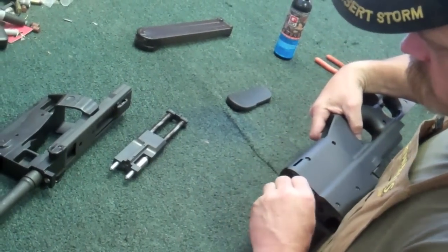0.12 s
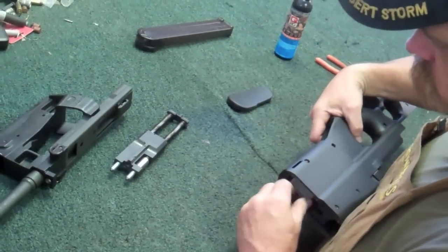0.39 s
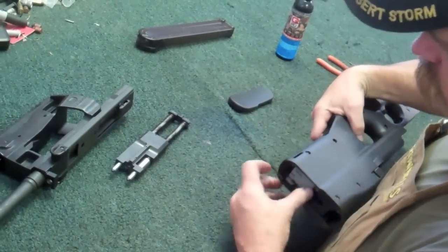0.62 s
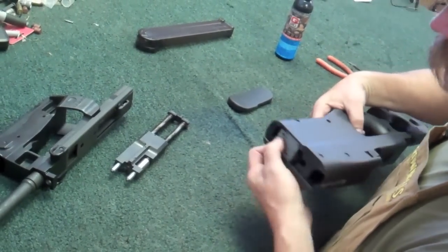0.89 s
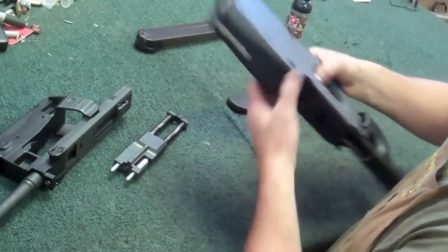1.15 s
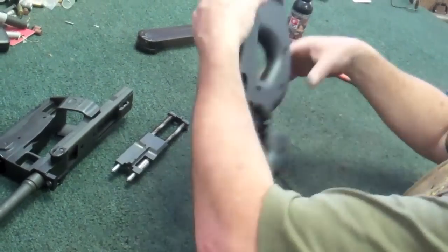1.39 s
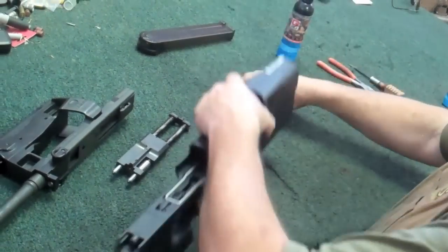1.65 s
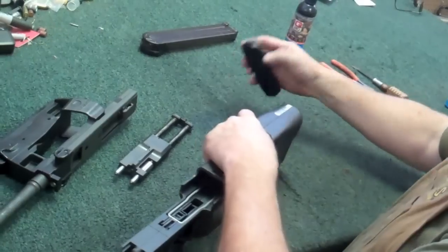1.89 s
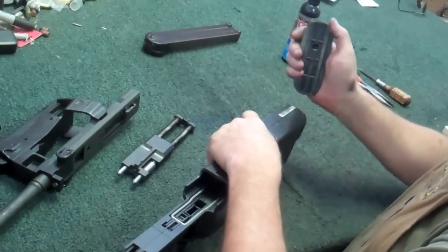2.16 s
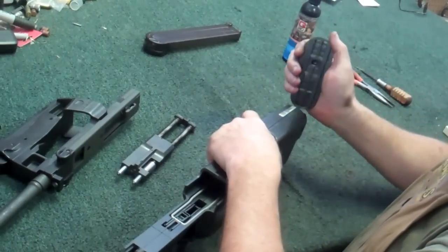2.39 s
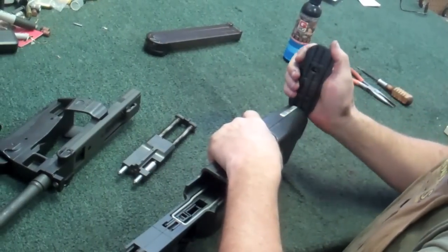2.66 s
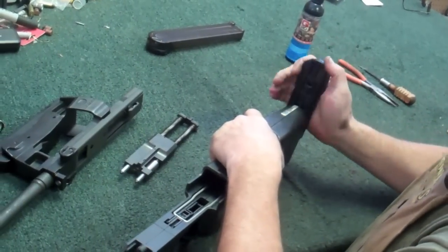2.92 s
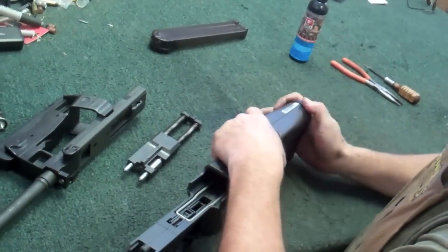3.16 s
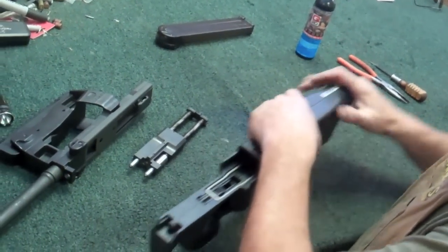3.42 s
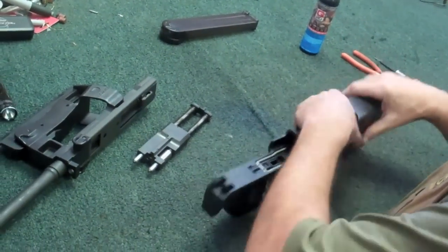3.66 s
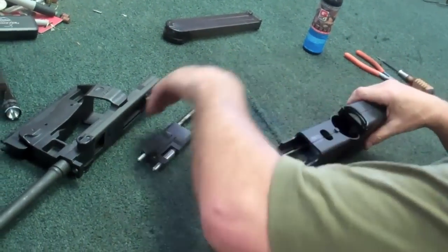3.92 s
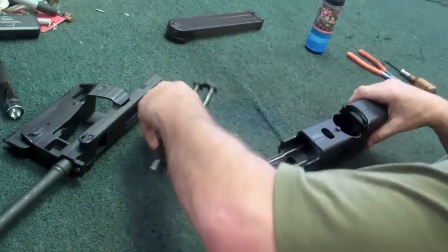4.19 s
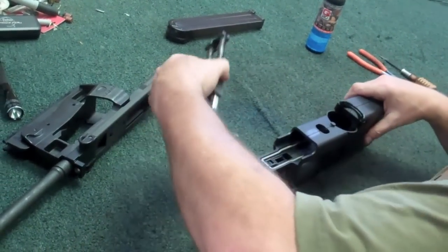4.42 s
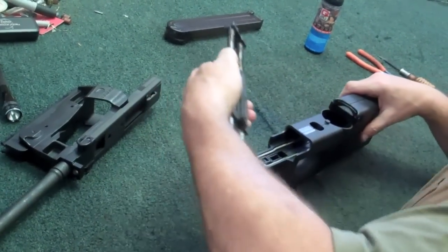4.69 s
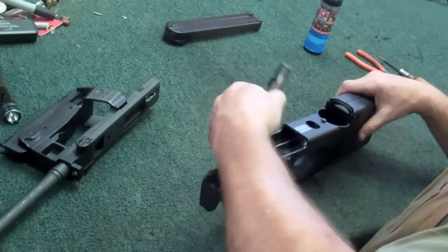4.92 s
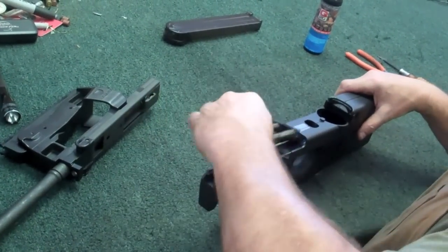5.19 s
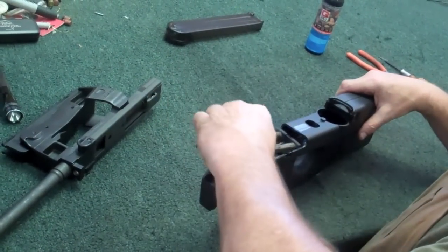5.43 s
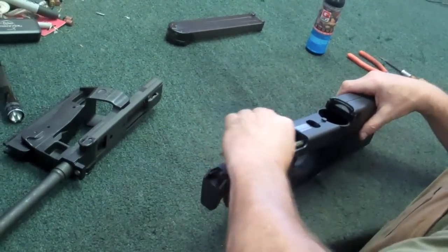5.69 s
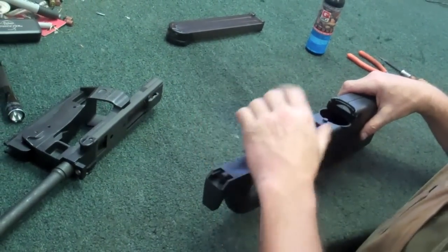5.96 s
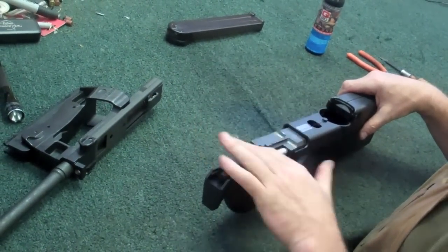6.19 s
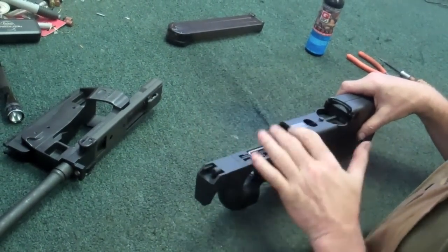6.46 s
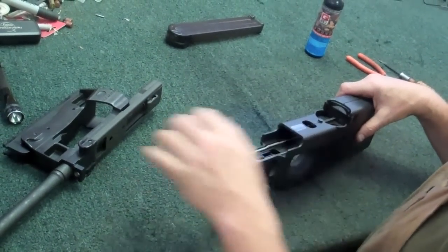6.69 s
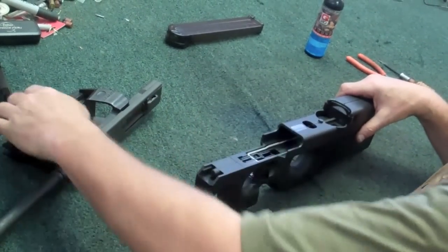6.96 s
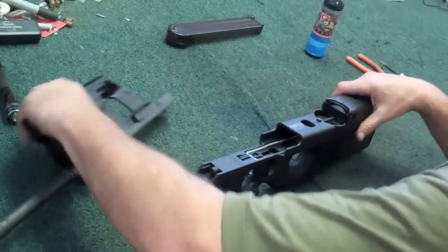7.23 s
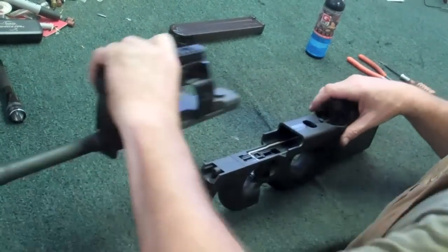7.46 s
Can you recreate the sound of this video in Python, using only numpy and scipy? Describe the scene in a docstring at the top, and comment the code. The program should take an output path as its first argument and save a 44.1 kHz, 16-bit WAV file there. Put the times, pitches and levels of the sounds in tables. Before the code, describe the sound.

In a small room, hollow polymer and steel firearm parts are handled close to a stereo microphone, louder on the left. Under everything lie steady hiss and a faint low lamp hum; a soft low rush swells briefly at 0.1 s. A rattling clack comes at 0.14 s, a loud hard snap at 0.43, then small bright ticks at 0.85, 1.15 and 1.58 with faint rubbing. Quiet knocks around 1.8 and 2.4-2.8 lead to a short rasp and the strongest, driest crack at 3.07. At 3.7 a scrape and dull bench thuds land with a small click. A lull follows, with another low rush around 4.3 and only faint clicks until 5.7. Sharp clacks burst at 5.8, then short slides catch in snaps at 6.25, 6.3 and 6.43. A bright tick at 7.23 and light rubbing finish by 7.6. Background noise dips after loud snaps, then creeps back.

```python
"""In a small room, over a felt-topped bench, two hands make steel and polymer firearm parts click and slide.
Contacts are rattling cracks that excite the modes of the hollow shell; rubbing is patchy noise, bright
by itself and dull through the shell. The stock, set down, thuds by ringing the low modes of the bench top.
The room answers with a decaying noise tail. Lamps hum in harmonics, microphones hiss, and a low rush
swells and fades twice. Gain control ducks the whole after the loud snaps."""
import sys
import numpy as np
from scipy import signal
from scipy.fft import rfft, irfft, next_fast_len
from scipy.io import wavfile
from scipy.ndimage import uniform_filter1d, map_coordinates

SR = 44100
rng = np.random.default_rng(int(sys.argv[2]) if len(sys.argv) > 2 else 0)


def to_wav(sig):
    """Store sig (one row per channel, or 1-D mono) as 16-bit WAV at the path in sys.argv[1].

    Samples outside -1..1 are clipped; the rate is SR.
    """
    pcm = np.clip(np.atleast_2d(sig), -1, 1) * 32767
    pcm = np.round(pcm).astype(np.int16)
    wavfile.write(sys.argv[1], SR, pcm.T)  # frames by channels


def linear_from_db(decibels):
    """Turn decibels (scalar or array-like) into linear amplitude factors; 0 gives 1."""
    return 10 ** (np.asarray(decibels, float) / 20)


N = 334719

# impacts of part on part: (time [s], relative crack level [dB], pitch the blow favours [Hz],
# hardness [0 polymer knock .. 1 steel tick], rattle decay t60 [s])
IMPACTS = [(0.0883, -32.5, 1150, .2, 0.064), (0.0964, -35.5, 770, 0.043, 0.049),
           (0.1326, -29.5, 770, 0.083, 0.017), (0.138, -13, 950, 0.33, 0.059),
           (0.143, -9.5, 1300, 0.15, 0.021), (0.421, -14.5, 934, 0.36, 0.054),
           (0.429, 1, 1496, 0.47, 0.031), (0.4329, -3.5, 1763, 0.41, 0.027),
           (0.589, -38, 2600, 0.37, 0.022), (0.7854, -41, 1420, 0.65, .02),
           (0.8418, -28, 1670, 0.87, 0.022), (0.8518, -19.5, 1690, 0.82, 0.027),
           (1.145, -19.5, 894, 1, 0.021), (1.1952, -48, 870, .16, 0.013), (1.2441, -33.5, 813, 0.86, 0.024),
           (1.3428, -49, 1700, 0.2, 0.022), (1.3634, -42.5, 1690, 0.26, .022),
           (1.435, -33.5, 1710, 0.63, 0.043), (1.467, -40, 1690, .48, .025),
           (1.4898, -39, 1700, 0.74, .015), (1.5801, -19, 1780, 0.54, 0.025),
           (1.5844, -19.5, 1680, 0.38, 0.028), (1.8076, -40.5, 1160, 0.57, 0.034),
           (1.8654, -43, 840, 0.36, 0.033), (2.4051, -27.5, 700, 0.2, 0.084),
           (2.554, -53.5, 790, 0.19, 0.023), (2.625, -45, 1025, 0.17, 0.015),
           (2.6678, -32, 770, 0.041, 0.038), (2.6764, -35.5, 840, .06, 0.067),
           (2.7229, -34.5, 970, 0.095, 0.022), (2.8279, -37, 1110, 0.24, 0.067),
           (3.07, 2, 2170, 0.42, .014), (3.0759, -12, 1120, 0.27, 0.013), (3.089, -27.5, 1125, 0.19, 0.033),
           (3.3276, -41.5, 890, 0.38, 0.034), (3.4191, -44, 890, 0.34, 0.023), (3.691, -33, 890, 0.29, .03),
           (3.713, -22, 896, 0.51, 0.026), (3.763, -48, 900, 0.59, .02), (4.056, -40.5, 884, 0.53, 0.091),
           (4.1754, -39.5, 2090, 0.45, 0.035), (5.2795, -43, 880, 0.083, 0.063),
           (5.4647, -33, 870, 0.28, 0.044), (5.4897, -38.5, 876, 0.19, .025),
           (5.5484, -47, 1260, 0.26, .022), (5.6717, -43, 880, 0.11, .015), (5.6996, -32.5, 940, 0.92, .01),
           (5.7836, -11.5, 1790, 0.56, 0.048), (5.787, -6.5, 804, 0.35, 0.01),
           (5.8084, -2, 700, 0.39, 0.022), (6.2478, -9.5, 1300, .5, 0.04), (6.3046, -2.5, 960, 0.45, 0.022),
           (6.3178, -13.5, 906, 0.42, .033), (6.3467, -26, 890, 0.19, 0.019),
           (6.4209, -14.5, 920, 0.42, .02), (6.429, -4, 1547, 0.45, 0.058),
           (6.437, -4.5, 1227, 0.51, 0.033), (7.2266, -17.5, 1780, 0.84, 0.026)]
# modes of the polymer shell and its steel inserts: (frequency [Hz], base level [dB], undamped-by-hand t60 [s])
SHELL_MODES = [(486, 1.5, 0.012), (616, 1, 0.01), (770, 2, 0.029), (930, 3, 0.027), (1049, 4, 0.077),
               (1125, -3, 0.27), (1160, -6, 0.019), (1282, -4.5, 0.073), (1442.6, -3, 0.046),
               (1690, 0, 0.05), (1833, -3.5, 0.044), (2180, -6, 0.017), (2456, 0, 0.034),
               (2980, -8.5, 0.0044), (4110, -4, 0.012), (4967, -16, 0.0026)]
# crack spectrum before its tilt with hardness: (frequency [Hz], relative density [dB])
CRACK_SPECTRUM = [(180, -33), (300, -24.5), (1010, -0.5), (2270, -0.5), (4300, -4), (6180, -2.5),
                  (7160, -6), (13600, -8.5), (15300, -35.5)]


def contacts(room_db=-13):
    """Impact excitation: a rattling crack sets the shell modes near its favoured pitch ringing."""
    out = np.zeros((2, N + SR))
    t = np.arange(SR // 5) / SR
    for start_s, level_db, favoured_hz, hardness, t60 in IMPACTS:
        # from softest to hardest: ring level over the crack [dB], brightness [dB per octave]
        ring_db = 11 + hardness * (-31.5 - 11)
        bright_db = -7 + hardness * (10 - -7)
        colour = lambda f: linear_from_db(along(CRACK_SPECTRUM, f) + bright_db * np.log2(f / 5000 + 0.06))

        swell = linear_from_db(-60 * t / max(t60, .004)) * (1 - np.exp(-t / 0.001))
        burst = rng.standard_normal((2, len(t))) * swell
        # the finest rattle differs from port to port
        fine_rattle = burst[1] - uniform_filter1d(burst[1], size=7)
        burst[1] = 0.64 * burst[0] + 0.42 * fine_rattle
        crack = filtered(burst, colour)
        crack_gain = linear_from_db(level_db + 1.5) / abs(crack[0]).max()

        blow = np.linalg.norm(swell) * (t == t[30])  # the single impact inside the rattle
        blow_click = crack_gain * filtered(blow, colour)
        ring = filtered(blow + burst[0], favouring(SHELL_MODES, favoured_hz, fall_db=12.5, focus_db=5.5))
        ring = linear_from_db(level_db + ring_db) * ring / abs(ring).max()

        sound = linear_from_db(room_db) * echo(ring + blow_click)
        sound[:, :len(t)] += ring + crack_gain * crack + 0.13 * blow_click
        start = round(start_s * SR)
        out[:, start:][:, :sound.shape[1]] += sound[:, :N + SR - start]
    return out[:, :N]


def favouring(modes, hz, fall_db, focus_db):
    """Selective modal excitation: strongest at the favoured pitch, with new random strengths each time."""
    excited = []
    for f, level, t60 in modes:
        octaves = abs(np.log2(f / hz))
        focus = focus_db * np.exp(-(octaves / 0.087) ** 2)
        excited.append((f, level - fall_db * octaves + focus + rng.normal(0, 1), t60))
    return ringing(excited)


def ringing(modes, damping=1):
    """Modal superposition: the causal response of damped resonators, which extra damping widens."""
    def response(f):
        total = 0
        for k, (centre, db, t60) in enumerate(modes):
            width = damping * np.log(1000) / (np.pi * t60)  # bandwidth [Hz]
            resonance = 1j * f * width / (centre * centre - f * f + 1j * f * width)
            total = total + (-1) ** k * linear_from_db(db) * resonance
        return total
    return response


# spectrum of bare rubbing: (frequency [Hz], relative density [dB])
SCRAPE_SPECTRUM = [(880, -29), (1500, -10.5), (2270, -2.5), (2480, -7), (4860, -5.5), (13100, -4.5),
                   (14600, -0.5), (15000, -45)]


def slides(room_db=-8):
    """Friction noise: uneven grit radiates brightly by itself and dully through the damped shell."""
    scrape_gain, shell_gain = strokes(rub_curves())
    scrape = unit(filtered(grit(patchy_db=2.5), lambda f: linear_from_db(along(SCRAPE_SPECTRUM, f))))
    shell = unit(filtered(grit(patchy_db=5.0), ringing(SHELL_MODES, damping=3.3)))
    direct = scrape_gain * scrape + shell_gain * shell
    return direct + linear_from_db(room_db) * echo(direct)[:, :N]


# parts sliding home, ever louder until they catch:
# (start [s], catch [s], relative scrape level at the catch [dB], shell level over scrape [dB])
SLIDES_HOME = [(0.402, 0.421, -43, 4.5), (3.009, 3.064, -26, -7.5), (3.599, 3.684, -44, -14.5),
               (5.755, 5.777, -28.5, -10), (5.798, 5.805, -32, 4), (6.217, 6.243, -40, -8),
               (6.262, 6.297, -23.5, -7), (6.327, 6.414, -29.5, -5.5), (7.061, 7.219, -54, -3)]
# fingers and parts rubbing:
# (start [s], strongest [s], end [s], relative scrape level at the strongest [dB], shell level over scrape [dB])
RUBBINGS = [(0, -0.001, 0.12, -56, 2.5), (0.295, 0.347, 0.49, -52, -3.5), (0.507, 0.541, 0.67, -53.5, 2.5),
            (.74, 0.795, 0.86, -50.5, -10.5), (0.944, .974, 1.08, -50, -8), (1.2, 1.222, 1.34, -48, -5.5),
            (1.276, 1.36, 1.44, -49, -21), (1.429, 1.458, 1.49, -47, -16), (1.652, 1.71, 1.95, -57, -1),
            (2.632, 2.68, 2.77, -59, 10), (2.847, 2.876, 2.98, -51, -2.5), (3.422, 3.478, 3.99, -52.5, -9),
            (3.682, 3.716, 3.772, -36, 0.5), (5.463, 5.48, 5.52, -52.5, 7), (7.318, 7.425, 7.6, -48.5, -21)]


def rub_curves():
    """Amplitude envelopes (time [s], scrape [dB], shell [dB]): a run-in only rises, a rub swells and fades."""
    rise_db, fade_in_db, fade_out_db = 14, 6.5, 16
    point = lambda s, db, shell_db: (s, db, db + shell_db)
    curves = []
    for start, catch, db, shell_db in SLIDES_HOME:
        curves.append([point(start, db - rise_db, shell_db), point(catch, db, shell_db)])
    for start, strongest, end, db, shell_db in RUBBINGS:
        curves.append([point(start, db - fade_in_db, shell_db), point(strongest, db, shell_db),
                       point(end, db - fade_out_db, shell_db)])
    return curves


def grit(patchy_db):
    """Stochastic friction: noise in short patches of random strength over time and pitch."""
    z = signal.stft(rng.standard_normal(N), nperseg=128)[2]
    field = uniform_filter1d(rng.standard_normal(z.shape), size=7, axis=0)
    field = uniform_filter1d(field, size=5, axis=1)
    noise = signal.istft(z * linear_from_db(patchy_db * unit(field)), nperseg=128)[1][:N]
    return noise * linear_from_db(1.2 * wobble(90))


def strokes(curves):
    """Amplitude modulation: a gain for each dB column of several short curves, silent between them."""
    t, total = np.arange(N) / SR, 0
    for rows in curves:
        s, *levels = np.transpose(rows)
        edge = np.clip(np.minimum((t - s[0]) / .003, (s[-1] - t) / .009) + 1, 0, 1)
        total = total + edge * linear_from_db(np.array([np.interp(t, s, db) for db in levels]))
    return total


# the stock meets the bench: (time [s], relative level [dB], pitch the push favours [Hz])
STOCK_LANDINGS = [(1.661, -44, 210), (1.803, -39.5, 70.0), (2.843, -46.5, 120.4), (3.063, -23, 401.5),
                  (3.127, -31.5, 163), (3.68, -19, 82), (3.701, -22.5, 234), (3.715, -25.5, 216),
                  (3.735, -26.5, 114.4), (3.769, -42, 148), (4.048, -50, 206.7), (5.463, -41.5, 225),
                  (5.8, -38, 76.4), (6.239, -40, 206.4), (6.337, -34.5, 299), (6.436, -30.5, 283),
                  (7.23, -46, 234)]
# modes of the bench top: (frequency [Hz], base level [dB], t60 [s])
BENCH_MODES = [(54.3, -4.5, 0.061), (82, -1.5, 0.15), (121, -1, 0.089), (170, 0, 0.044), (200, 1, 0.079),
               (234, -2.5, 0.14), (309.3, -5, 0.029), (423, -6, 0.052), (490, -8.5, 0.025)]


def bench(room_db=-18):
    """Soft impact on a plate: a push through the felt, then bumpy settling, ring the low bench modes."""
    push_s, settle_s = 0.0028, 0.026  # how long the felt gives, how long the stock then bumps on it
    out = np.zeros(N + SR)
    t = np.arange(SR // 2) / SR
    for start_s, level_db, favoured_hz in STOCK_LANDINGS:
        push = t / push_s * np.exp(-t / push_s)
        bumps = 5.8 * uniform_filter1d(rng.standard_normal(len(t)), size=15) * np.exp(-t / settle_s)
        thud = filtered(push + bumps, favouring(BENCH_MODES, favoured_hz, fall_db=7, focus_db=0))
        out[round(start_s * SR):][:len(t)] += linear_from_db(level_db) * thud / abs(thud).max()
    return out[:N] + linear_from_db(room_db) * echo(out[:N])[:, :N]


# reverberation of the small room: (frequency [Hz], t60 [s])
ROOM_DECAY = [(150, 0.8), (1000, 0.35), (4000, .3), (12000, 0.29)]


def echo(x, seconds=0.44, split_hz=1500):
    """Diffuse reverberation: a noise tail, alike at both ports in the bass, decays at its own rate per pitch."""
    noise = rng.standard_normal((2, int(SR * seconds)))
    hz, t, z = signal.stft(noise, SR, nperseg=256)
    apart = (hz / (hz + split_hz))[:, None]
    z[1] = apart * z[1] + np.sqrt(1 - apart ** 2) * z[0]
    decay = linear_from_db(-60 * t / along(ROOM_DECAY, hz)[:, None])
    tail = signal.istft(z * decay, SR, nperseg=256)[1]
    delayed = np.pad(x, (220, 0))[None]  # 5 ms before the room answers
    return signal.fftconvolve(delayed, tail / np.linalg.norm(tail[0]), axes=1)


# the hands are nearer the left port: (frequency [Hz], left-to-right level [dB])
NEAR_LEVEL = [(100, 8), (600, 7), (2000, 7), (5000, 8), (14000, 8)]
# phase between the ports: (frequency [Hz], left minus right phase [rad])
NEAR_PHASE = [(500, 0), (2000, -.4), (5000, -1), (12000, -1.6)]


def ports(x):
    """Interaural-style level and phase difference: a near source is louder at the left microphone port."""
    half = np.array([[.5], [-.5]])
    level = lambda f: linear_from_db(half * along(NEAR_LEVEL, f) - .5)
    return filtered(x, lambda f: level(f) * np.exp(1j * half * along(NEAR_PHASE, f)))


# partials of the lamps: (frequency [Hz], relative level [dB])
LAMP_PARTIALS = [(120, -86), (239.5, -66), (359, -71), (479, -75.5), (599, -91), (719, -91.5)]


def lamp_hum():
    """Additive synthesis: near-harmonic partials buzz with slight random level and phase modulation."""
    t = np.arange(N) / SR
    hum = 0
    for hz, db in LAMP_PARTIALS:
        level = linear_from_db(db + 1.3 * wobble(12)) * np.sqrt(2)
        hum = hum + level * np.sin(2 * np.pi * hz * t + 0.22 * wobble(8.2))
    return hum * sides(5.6)


# a low rush swells and fades, one curve for each: (time [s], relative level [dB])
RUSH_CURVES = [
    [(0.0, -69), (0.126, -51.5), (0.4, -57)],
    [(4.0, -73.5), (4.322, -57.5), (5.25, -71.5)],
]


def low_rush():
    """Resonant filtering: noise through two broad low resonances, with an unsteady swelling level."""
    resonances = ringing([(326, -0.94, .03), (477, -1, .02)])
    band = unit(filtered(rng.standard_normal((2, N)), resonances))
    partly_shared = 0.61 * band[0] + .6 * band
    return strokes(RUSH_CURVES) * linear_from_db(3.2 * wobble(12)) * partly_shared * sides(4)


# spectrum of the hiss: (frequency [Hz], relative density [dB])
HISS_SPECTRUM = [(15, -47.5), (25, -11), (186, -11), (237, -6.5), (286, -9), (363, -6), (427, -13.5),
                 (488, -13.5), (604, -11.5), (833, -13), (1500, -15.5), (8320, -19), (13500, -16),
                 (15000, -24.5)]
# correlation of the hiss between the sides: (frequency [Hz], left-right likeness [-1 .. 1])
HISS_LIKENESS = [(60, 0.22), (240, 0.48), (940, 0.013), (3740, 0.077), (14800, -0.01)]
# balance of the hiss: (frequency [Hz], left-to-right level [dB])
HISS_BALANCE = [(60, -2), (180, 8), (540, 1.5), (1640, 3.5), (4920, 3), (14800, 8.5)]


def microphone_hiss():
    """Partial coherence: independent mid and side noises mix into hiss that is partly shared in the bass."""
    turn = lambda f: np.arccos(np.clip(along(HISS_LIKENESS, f), 0, 1)) / 2
    colour = lambda f: linear_from_db(along(HISS_SPECTRUM, f)) * [np.cos(turn(f)), np.sin(turn(f))]
    mid, side = filtered(rng.standard_normal((2, N)), colour)
    half = np.array([[.5], [-.5]])
    hiss = filtered(np.array([mid + side, mid - side]), lambda f: linear_from_db(along(HISS_BALANCE, f) * half))
    return linear_from_db(-55) * unit(hiss)


def unit(x):
    """Power normalisation: x scaled to rms 1."""
    return x / np.sqrt(np.mean(x ** 2) + 1e-20)


def along(points, hz):
    """Logarithmic frequency scale: (frequency [Hz], value) points interpolated on it."""
    f, v = np.transpose(points)
    return np.interp(np.log(hz + 1), np.log(f + 1), v)


def filtered(x, response):
    """Linear filtering: the spectrum of x times a complex response of frequency."""
    m = next_fast_len(x.shape[-1] + 8192)
    spectrum = rfft(x, m) * response(np.fft.rfftfreq(m, 1 / SR))
    return irfft(spectrum, m)[..., :x.shape[-1]]


def wobble(rate):
    """Slow random modulation: a smooth curve through random knots, rate of them a second."""
    knots = rng.standard_normal(int(N * rate / SR) + 4)
    return map_coordinates(knots, [np.arange(N) * rate / SR])


def sides(db):
    """Intensity stereophony: left and right gains db apart, whose mean is 1."""
    pair = linear_from_db(np.array([[db / 2], [-db / 2]]))
    return pair / pair.mean()


def scene():
    """Superposition: the near sources as the ports receive them, over the background."""
    near = ports(contacts() + slides() + bench())
    return near + lamp_hum() + low_rush() + microphone_hiss()


def low_pass(x):
    """Removes everything above the highest recorded frequency."""
    return signal.sosfilt(signal.butter(12, 15410, fs=SR, output="sos"), x)


def record(dry):
    """Dynamic compression: gain sinks after loud sound and creeps back; peaks beyond full scale clip."""
    power = np.mean(dry ** 2, axis=0)
    for seconds in (.05, .06, .07):  # three smoothers in a row make the gain lag
        keep = np.exp(-1 / (seconds * SR))
        power = signal.lfilter([1 - keep], [1, -keep], power)
    gain = (1 + power / linear_from_db(-59.5)) ** -.4
    # steep treble limit: 0.25 dB per Hz above 14250 Hz, down to -52 dB
    limited = filtered(dry, lambda f: linear_from_db(np.clip(-.25 * (f - 14250), -52, 0)))
    mix = np.clip(limited * gain, -1, 1)
    return low_pass(mix)


dry = scene()
out = record(dry)
to_wav(out)
```